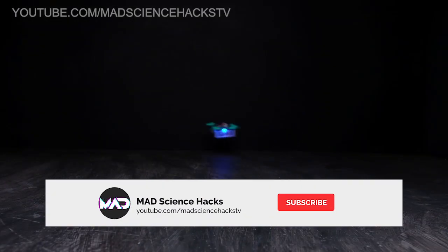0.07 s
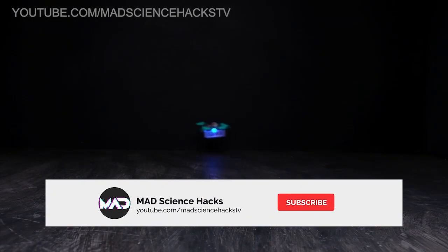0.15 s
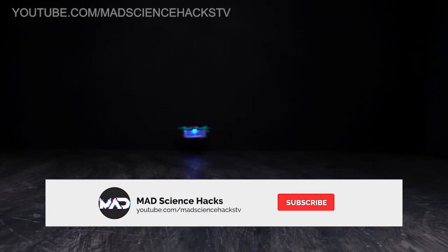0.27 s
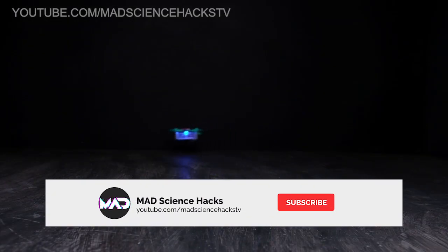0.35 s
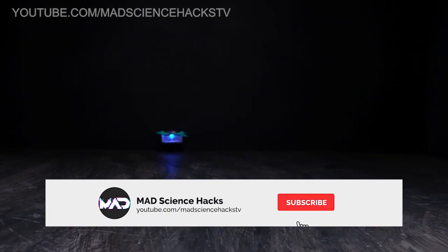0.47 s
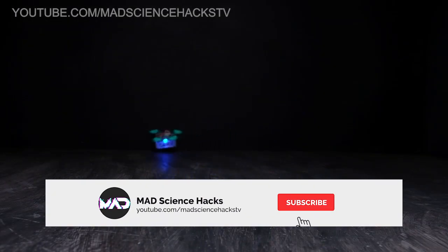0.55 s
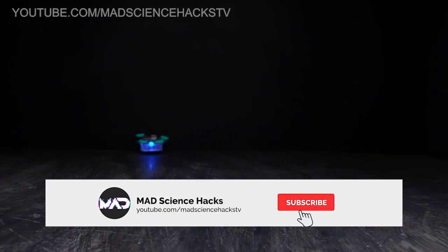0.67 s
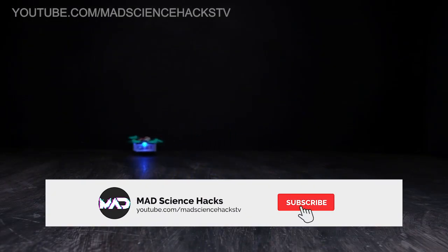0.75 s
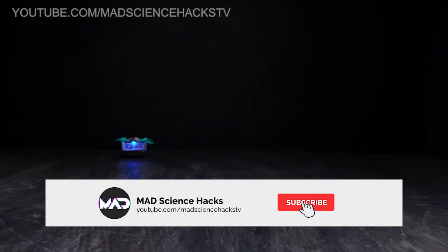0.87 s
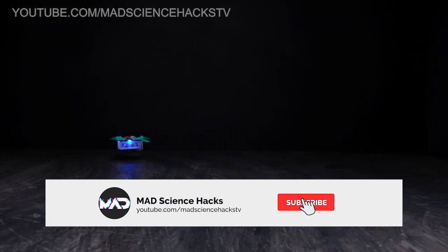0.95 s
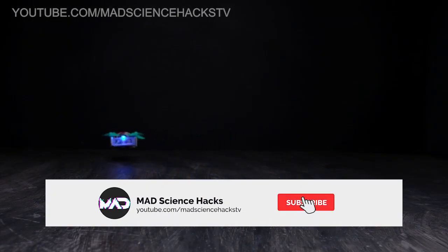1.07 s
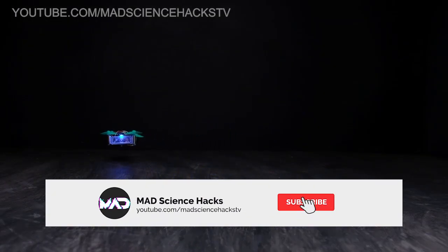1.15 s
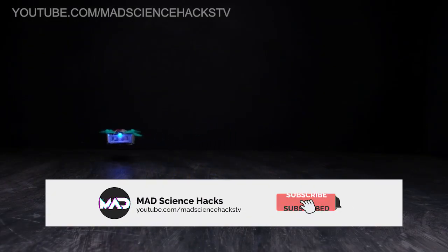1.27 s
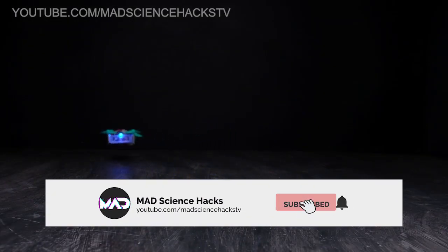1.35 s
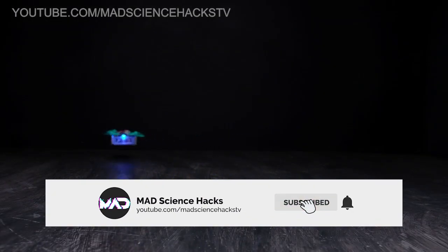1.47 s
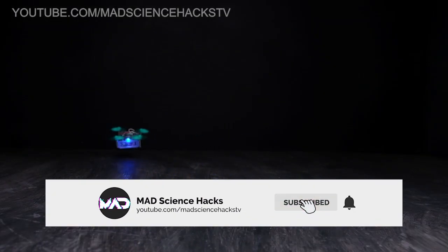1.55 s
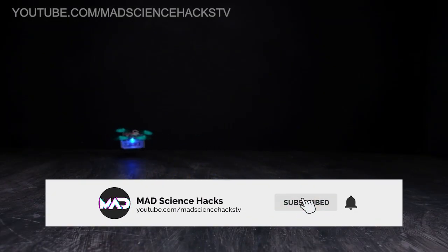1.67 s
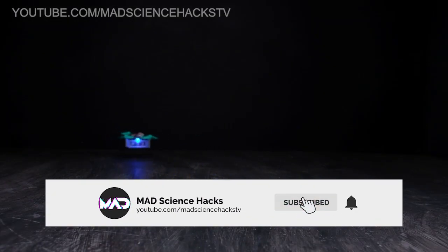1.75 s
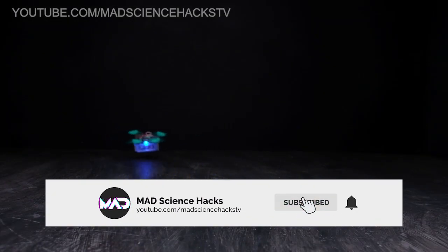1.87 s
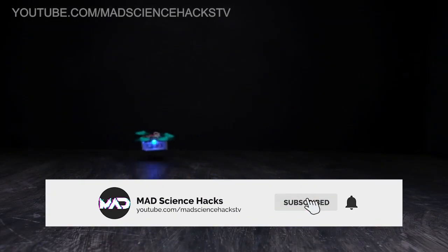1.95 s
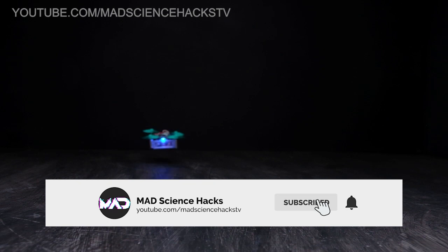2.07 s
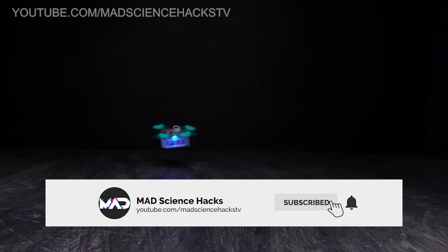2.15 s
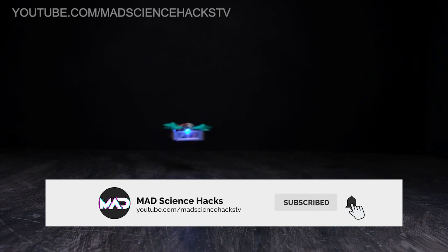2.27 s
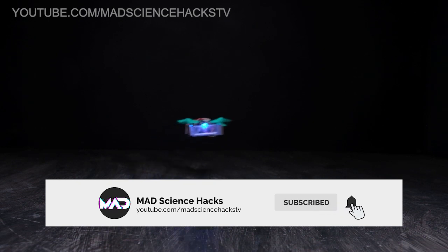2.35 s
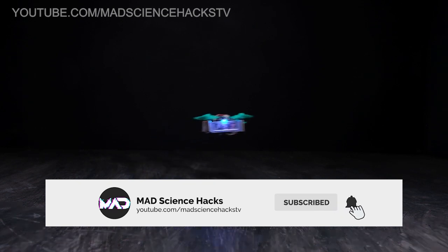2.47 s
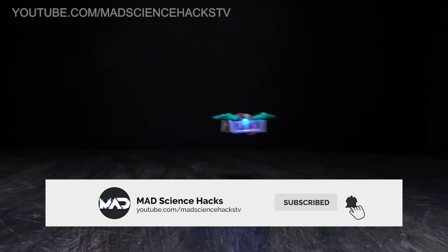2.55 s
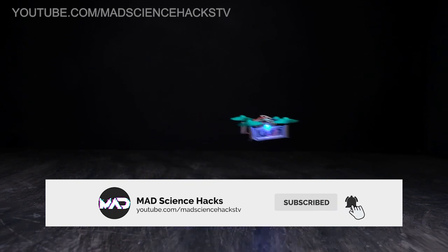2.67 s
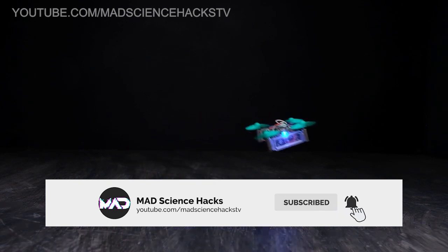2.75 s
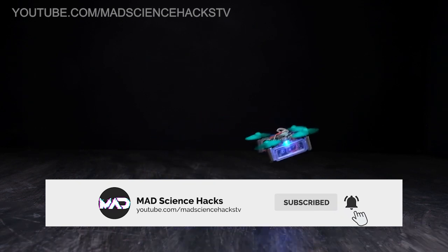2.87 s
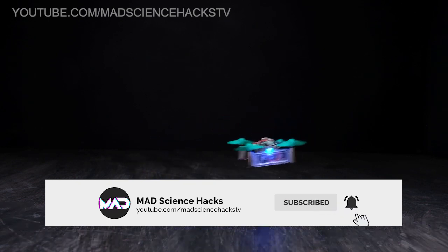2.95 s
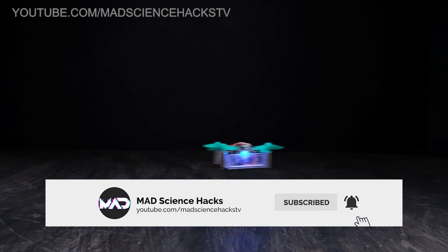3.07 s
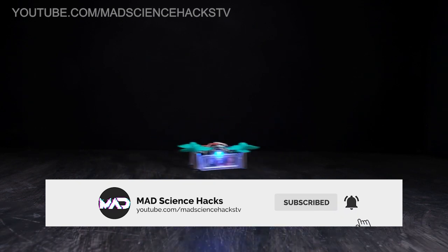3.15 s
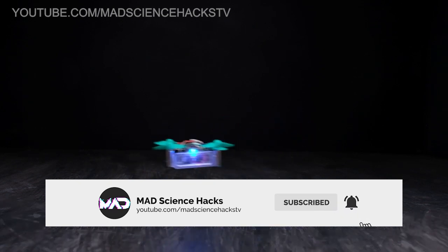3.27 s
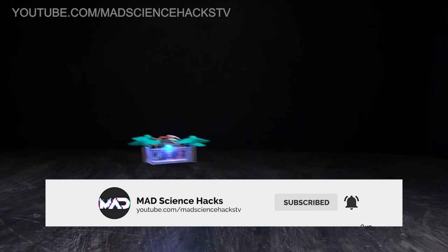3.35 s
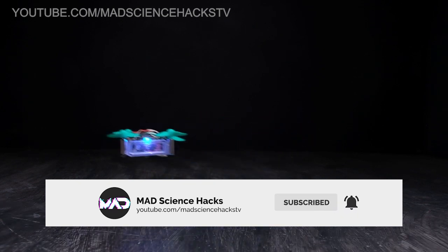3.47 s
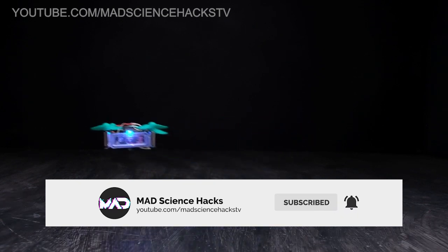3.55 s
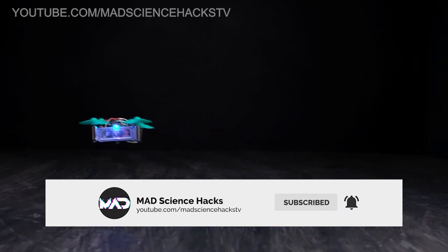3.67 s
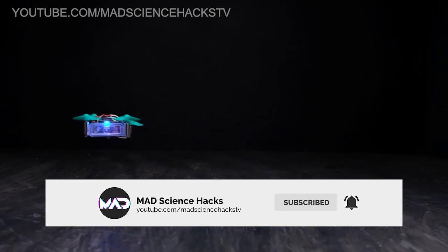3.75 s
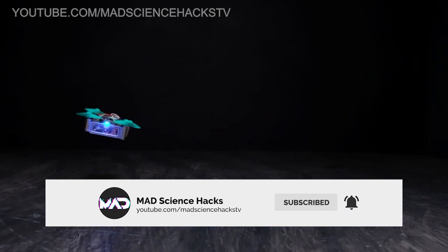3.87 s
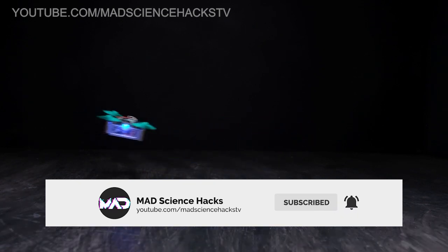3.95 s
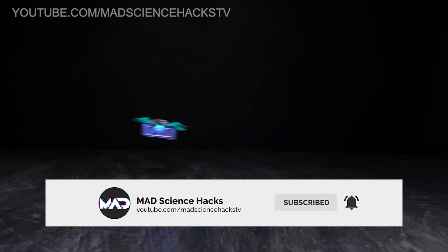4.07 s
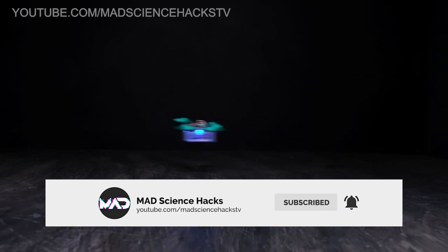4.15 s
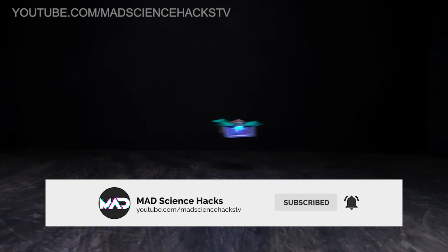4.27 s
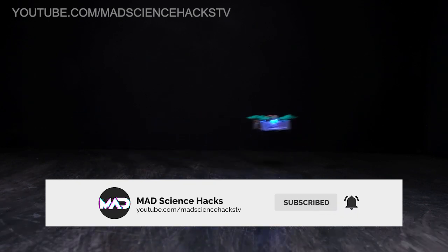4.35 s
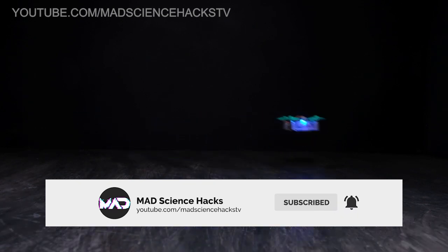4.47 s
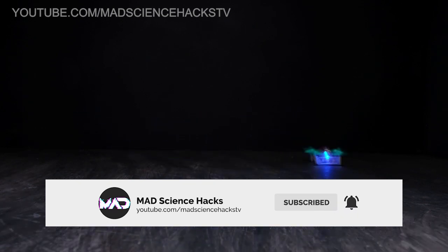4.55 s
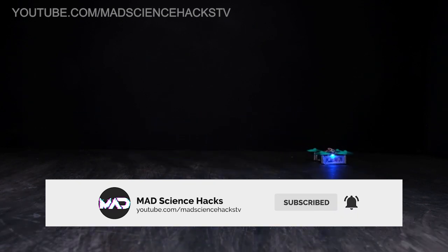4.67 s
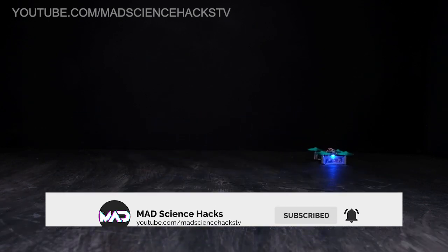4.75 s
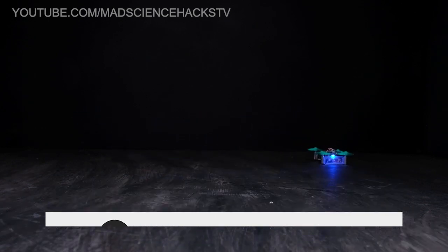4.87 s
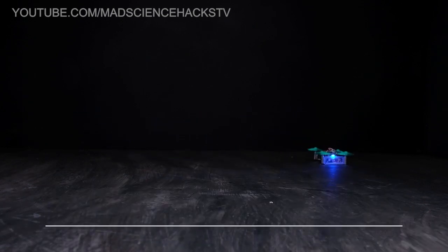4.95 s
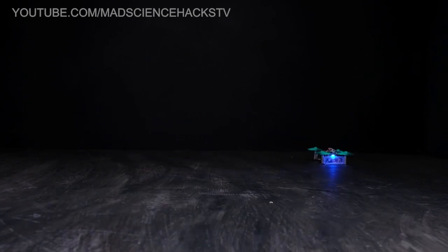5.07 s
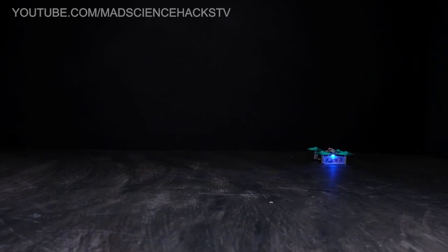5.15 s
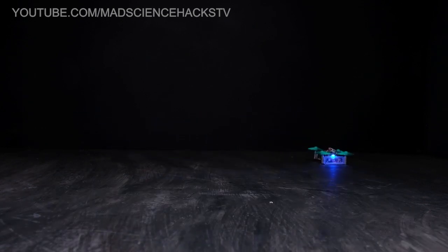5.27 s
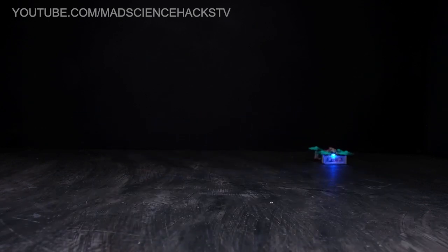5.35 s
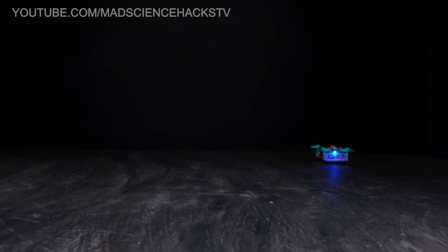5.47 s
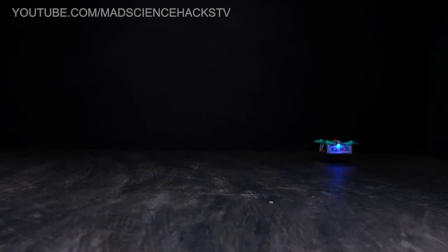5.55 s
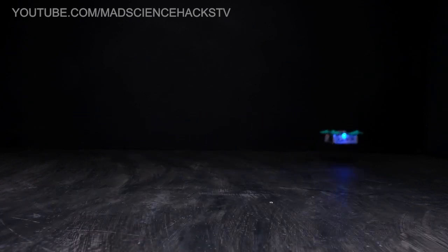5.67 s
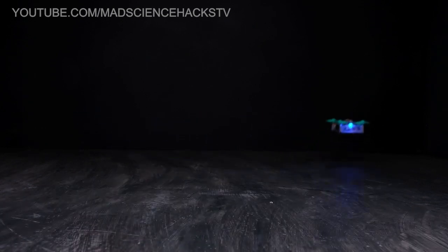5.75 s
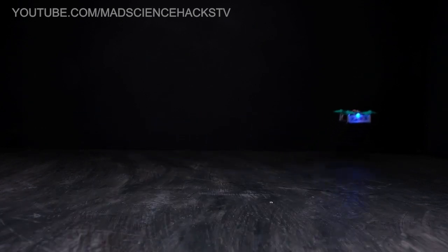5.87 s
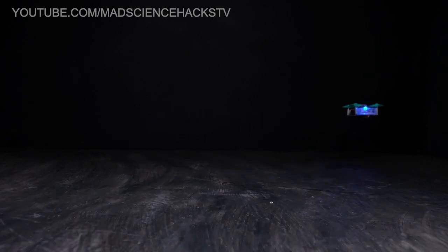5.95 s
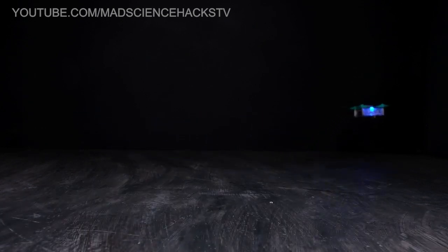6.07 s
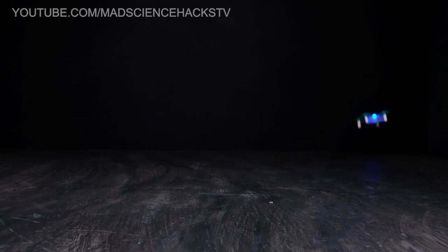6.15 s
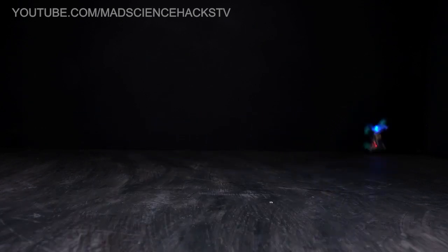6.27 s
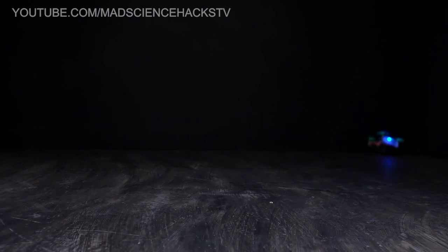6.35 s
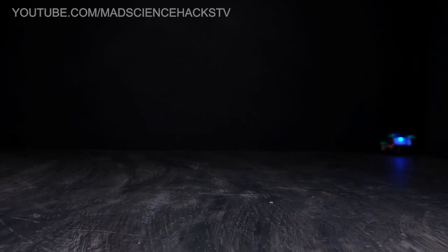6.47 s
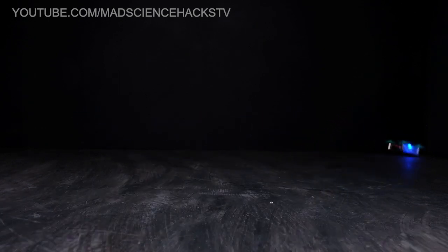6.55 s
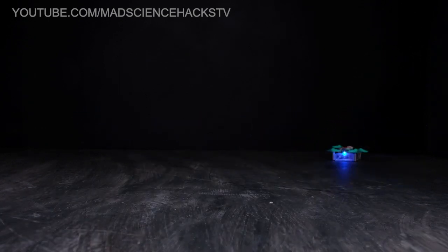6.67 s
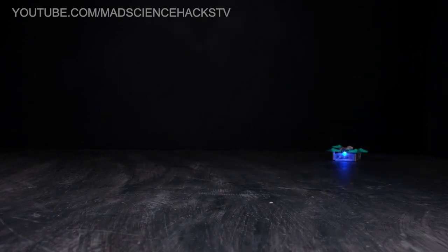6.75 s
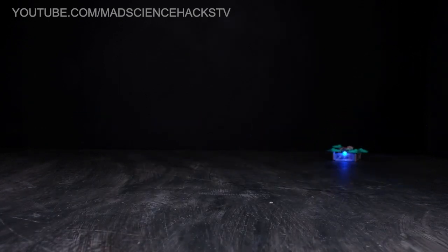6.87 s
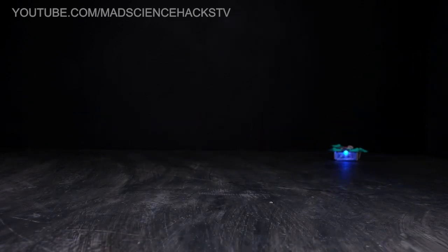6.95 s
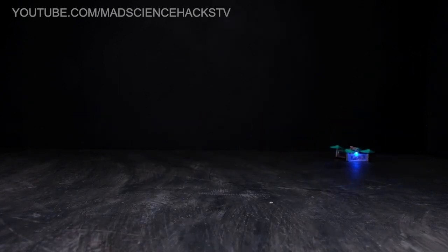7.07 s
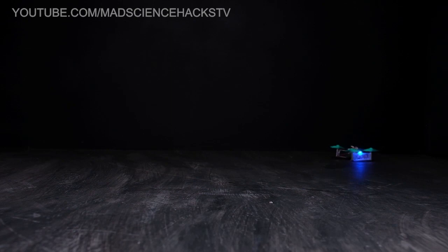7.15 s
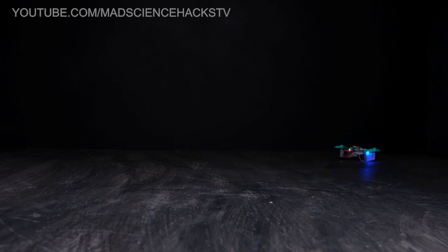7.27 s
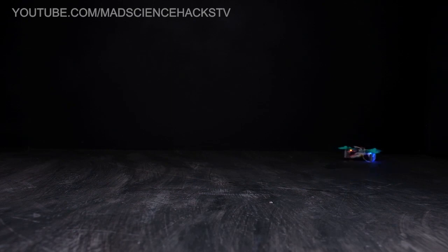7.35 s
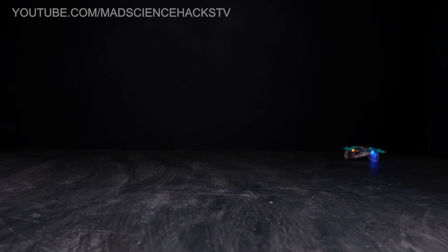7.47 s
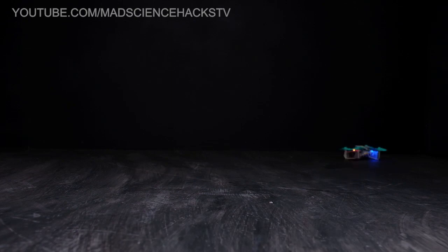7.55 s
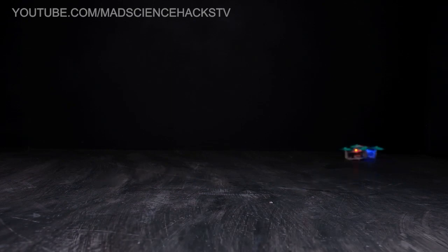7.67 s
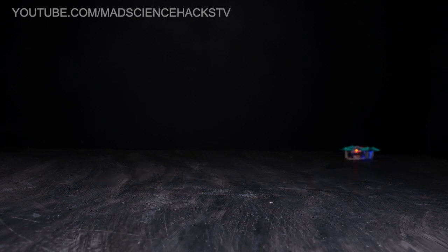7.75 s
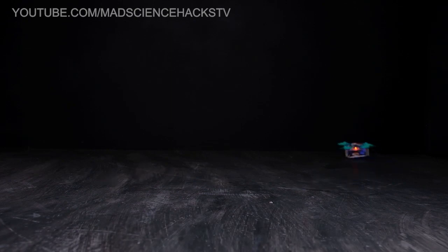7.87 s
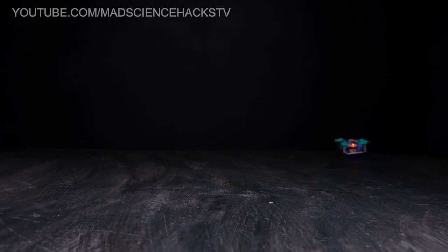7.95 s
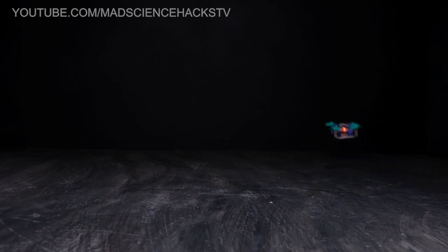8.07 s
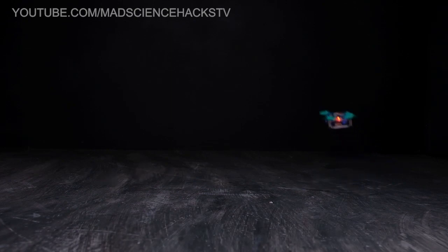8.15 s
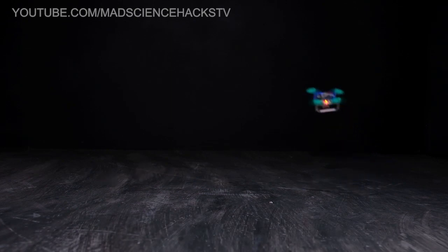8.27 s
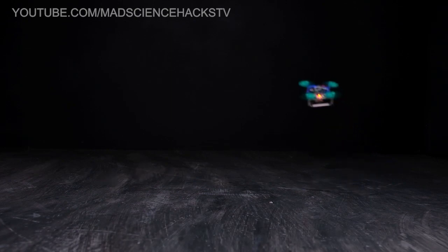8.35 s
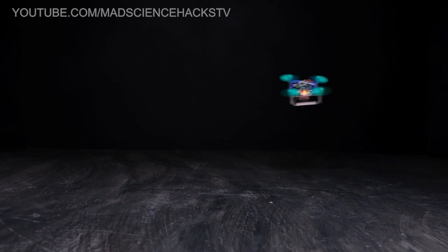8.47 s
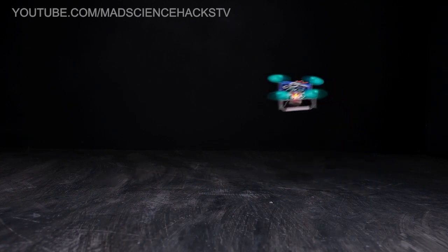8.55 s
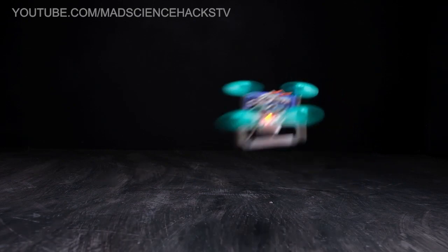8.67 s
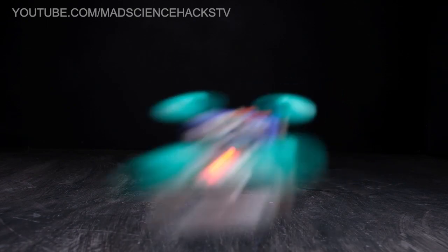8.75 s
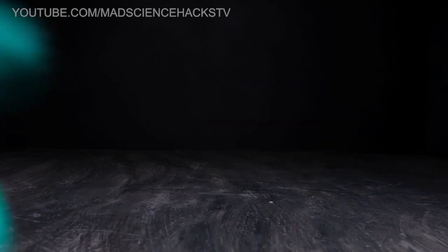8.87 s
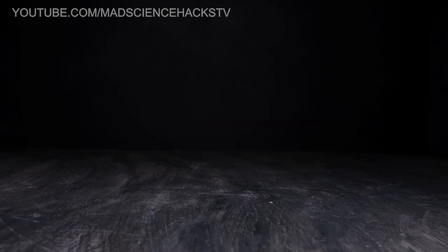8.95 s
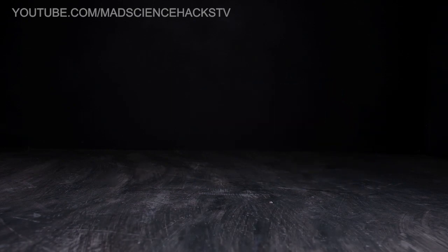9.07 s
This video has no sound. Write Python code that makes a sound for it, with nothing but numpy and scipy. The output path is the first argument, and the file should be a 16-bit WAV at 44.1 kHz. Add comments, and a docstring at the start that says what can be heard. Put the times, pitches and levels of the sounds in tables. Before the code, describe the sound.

In a small, quiet room with faint bass-heavy room tone and low hum, a tiny four-rotor drone hovers from the start. Its slightly detuned whines, near 1.5-1.75 kHz, beat and flutter many times a second under a bright buzzing hiss. A plastic knock sounds at 0.5 s; pitch rises towards 2.4 s and wavers. At 4.4 s throttle is cut, the whine falls steeply, and a dull thump with small taps lands at 4.6 s. Motors spin up at 5.0 s and again at 5.35 s into flight. At 6.26 s it crashes with a crack, choking the rotors, skidding and clattering until 6.75 s. From 7.0 to 7.8 s, seven quick whine bursts peak near 1.8-2 kHz, with soft bumps between. It climbs after 7.8 s, whine unsteady, then at 8.84 s strikes loudly and close, with ticking blades, falling pitch and last knocks around 9.05 s.

```python
"""A tiny four-rotor drone hovers in a room over faint room tone and hum; its four whines weave.
There is an early knock, then the throttle is cut, it drops onto the floor and lifts off again.
It crashes and skids, hops on the floor in bursts of throttle, then climbs and strikes something close.
Each rotor has four blades: the whine follows its turning, and the blades chop noise into a hiss.
Knocks are short bursts of noise that ring the light plastic frame and thump the floor."""
import sys
import numpy as np
from scipy import signal
from scipy.fft import rfft, irfft, next_fast_len
from scipy.io import wavfile

SR = 44100
rng = np.random.default_rng(int(sys.argv[2]) if len(sys.argv) > 2 else 0)


def to_wav(s):
    """Save 16-bit WAV."""
    ch = np.atleast_2d(s).T  # columns
    pcm = np.round(np.clip(ch, -1, 1) * 32767)  # PCM
    wavfile.write(sys.argv[1], SR, pcm.astype(np.int16))


N = 401310
TIME = np.arange(N) / SR

# Blade rate that holds the drone in the air: start_s, fastest_rotor_hz
HOVER = [(0, 1537), (.4, 1590), (1.35, 1595), (2.45, 1767), (3.3, 1675), (3.8, 1726), (4.4, 1734),
         (5.55, 1599), (5.9, 1680), (6.15, 1591), (8.0, 1615), (8.35, 1754), (8.62, 1668), (8.9, 1708)]
# Throttle cut, opened in two steps, eased after the crash, opened, eased again:
# start_s, share_of_hover_speed, settling_time_s
THROTTLE = [(4.425, .15, .125), (5.03, .8, .11), (5.345, 0.99, .06), (6.3, 0.89, .1), (7.8, 1, 0.0301),
            (8.9, 0.77, .12)]
# Bursts of throttle that make it hop on the floor: top_s, blade_rate_hz
BURSTS = [(6.99, 2008), (7.175, 1878), (7.305, 1870), (7.43, 1838), (7.553, 1839), (7.685, 1815),
          (7.82, 1831)]
BURST_RISE_HZ_PER_S, BURST_SAG_HZ_PER_S = 8800, 4700

# How far the flight controller hunts, swinging the rotor speeds: start_s, share_of_speed
HUNT = [(0, .02), (.8, .032), (2.4, .034), (3.4, .054), (5.3, .022), (5.6, .038), (6.2, .036), (6.74, .002),
        (6.92, .002), (7.05, .013), (7.8, .017), (8.0, .04)]
FREE_FLIGHT_HUNT = .03  # share of speed; this much hunting or more counts as full flight
# The drone banks or rocks and its rotors part in speed: middle_s, length_s, depth_0_to_1
BANKS = [(0.049, .3, 0.42), (0.849, .35, 0.41), (2.101, .14, .7), (2.87, .17, 1), (3.98, 0.078, 0.93),
         (5.42, .1, .7), (6.15, .08, 0.92), (7.501, .35, .35), (8.65, .12, 0.89)]
# Gap between fastest and slowest rotor, as a share of speed: at rest, added in flight, added in a full bank
REST_SPREAD, FLIGHT_SPREAD, BANK_SPREAD = .042, .05, .09
# The four rotors, later balanced to unit power together:
# place_slowest_0_to_fastest_1, level_db, hunting_rate_hz
ROTORS = [(.9, 0, 18), (.78, -3, 16), (.3, -6, 17), (-.2, -5.5, 16)]
# Whine partials: multiple_of_shaft_rate, level_db (against the blade tone)
SHAFT_ORDERS = [(1, -18.5), (2, -25), (3, -18), (4, 0), (5, -20), (6, -23), (7, -20)]

# Loudness at the reference blade rate, before the mix levels in drone(), and its growth with speed
REFERENCE_HZ = 1664
WHINE_DB, WHINE_DB_PER_OCTAVE = -38.5, 18
RASP_DB, RASP_DB_PER_OCTAVE = -39.5, 11.5
BANK_WHINE_DB, BANK_RASP_DB = -2.5, 0.5  # in a full bank
REST_WHINE_DB = 1.8  # the floor reinforces the whine while the drone sits on it
REST_SMOOTH_DB = 7  # the inflow is smoother at rest
BURST_WHINE_DB_PER_OCTAVE = -8.5  # a burst churns the air, which holds the whine back
# Blades foul on an obstacle, which chokes whine and rasp: start_s, length_s
FOULS = [(6.26, 0.485), (8.848, .3)]
FOUL_WHINE_DB, FOUL_RASP_DB = -14, -4
# Nearness of the drone to the microphone: start_s, level_db
NEARNESS = [(0, 0.2), (.5, 1), (1.25, -0.5), (1.7, 0.4), (2.4, -1.64), (3.2, 0.76), (4.0, -1), (4.38, -1),
            (5.15, -1), (5.55, 0.7), (6.1, -2.5), (6.85, -2.5), (7.2, -1.7), (8.05, 0), (8.25, -3),
            (8.6, -0.5), (8.84, 6.5), (9.0, -3.5)]

# Balance of pitches in the rotors' buzz and hiss: pitch_hz, level_db
RASP = [(1290, -33), (2200, -5.5), (2910, -3), (3260, -3), (3630, -2), (4010, -1.5), (4420, -3.5),
        (5120, -1.5), (6940, -5.5), (8520, -4), (9960, -10.5), (11000, -11.5), (12400, -10), (15600, -17)]
# Balance of pitches in the rush of air: pitch_hz, level_db
WASH = [(60, -25.5), (180, -13.5), (330, -11), (600, -8.5), (900, -4.5), (1200, 3), (1600, 5.5),
        (2200, -3.5), (3000, -16), (6000, -23)]
# Extra path of the floor's echo as the drone moves about: start_s, lag_ms
ECHO = [(0, 1.12), (.72, 0.72), (1.05, 1.48), (1.35, 1.57), (1.65, 1.04), (1.95, 1.32), (2.7, 3.13),
        (3.35, 3.95), (3.95, 2.9), (4.55, 1.6), (5.7, 1.53), (6.1, .6), (7.9, .45), (9.1, 1.2)]
# The surface mirrors mostly the upper rasp: pitch_hz, level_db
ECHO_COLOUR = [(500, -2.5), (2000, -13), (3500, -2.5), (5300, 3), (7500, -15), (15000, -19)]
ECHO_STRENGTH, ECHO_BEST_LAG_MS, ECHO_WIDTH_OCTAVES = 0.45, 1.7, 0.98

# Spells of a thin sizzle near 4 kHz: start_s, length_s, level_db (at the reference blade rate)
SIZZLES = [(0, .45, -52), (4.65, .95, -47.5), (6.75, 0.13, -53)]
SIZZLE_FADE_DB_PER_S, SIZZLE_DB_PER_OCTAVE = 54, 5.5

# How long the room rings: pitch_hz, time_to_fall_60_db_s
ROOM_DECAY = [(100, 0.48), (500, 0.44), (1500, 0.33), (5000, 0.24), (14000, 0.22)]
# Balance of pitches in the quiet room: pitch_hz, level_db
ROOM_TONE = [(25, -2.5), (40, -8), (60, -12.5), (100, -11.5), (165, -15.5), (340, -18.5), (880, -21),
             (2500, -23), (6000, -23), (15600, -25)]
ROOM_TONE_DB = -59.5
HUM_DB, HUM_END_S = -69.5, 6.27

# Blows on the frame, the contact holding for 79 % of its listed time before it dies away:
# start_s, contact_s, strength_db, body_db and treble_db (against the strength), room_db
BLOWS = [(0.5434, 0.0072, -13.5, -10.5, 2.5, -8), (4.609, 0.007, -16, -9, -14, -2.5),
         (4.668, 0.0024, -35, -9, -4, -0.5), (4.692, 0.0029, -33.5, -13, -5, -2),
         (6.2573, .0074, -8.5, -13.5, -3, -11.5), (6.3134, 0.004, -27.5, -3, 6.5, -9),
         (6.333, 0.0036, -28.5, -6.5, 4, 1), (6.401, 0.0077, -25, -24, 7.5, -3.5),
         (6.423, .0062, -32.5, -4, 3, 1), (6.4631, 0.0031, -31.5, -5, 8.5, -1),
         (6.509, .0077, -32, -9, 9, -1), (6.553, .0086, -37, 0.5, 3.5, -2),
         (6.624, 0.0019, -16.5, -10, -15.5, -4), (6.699, .0023, -40, -4, -1.5, -20),
         (8.8418, 0.0039, -3, -7, -1, -27), (8.856, 0.0058, -24, -22, 3.5, -9),
         (8.934, .0065, -34, -19, 12, -12.5), (9.042, 0.0092, -13.5, -37, -4, -5),
         (9.055, 0.0069, -19.5, -17, -2, -9)]
# Ring of the frame: pitch_hz, width_hz, level_db
FRAME = [(516, 260, -5), (1440, 340, 3.5), (2280, 100, -2.5), (3320, 4700, -11), (7320, 480, -2.5),
         (8560, 410, -5.5)]
THUMP_DB, THUMP_PER_TREBLE = -17, 0.83  # floor thump against the body: duller blows thump more

# Soft low puffs: middle_s, length_s, level_db, centre_hz
PUFFS = [(1.238, 0.06, -56, 240), (1.481, 0.072, -59.5, 220.1), (4.65, .05, -47, 65),
         (5.27, .12, -59.5, 269.6), (8.86, .06, -45, 46), (9.02, 0.17, -51.5, 46)]
# Each hop comes down just before the next burst, harder after a faster one
HOP_LEAD_S, HOP_LENGTH_S, HOP_HZ, HOP_DB, HOP_DB_PER_OCTAVE = 0.067, .05, 222, -60.5, 43
# The frame skids over the floor: start_s, length_s, rumble_db, rumble_fade_db_per_s, scratch_db
SKIDS = [(6.27, .355, -37, 24, -33.5), (6.63, 0.11, -31.5, 92, -59)]
# A blade ticks along an obstacle (one row): start_s, length_s, tick_rate_hz, level_db
GRAZE = (8.871, .025, 850, -24)
CUTOFF_HZ = 15900


def from_db(db):
    """Turn decibels into a gain."""
    return 10 ** (np.asarray(db) / 20)


def rms_one(x):
    """Scale to unit power."""
    return x / np.sqrt(np.mean(x ** 2) + 1e-20)


def in_time(rows):
    """Read each column of a curve at every sample, with straight lines between its points."""
    s, *columns = np.transpose(rows)
    return [np.interp(TIME, s, column) for column in columns]


def since(s):
    """Seconds since a moment, zero before it."""
    return np.maximum(TIME - s, 0)


def during(s, length_s, edge_s=.004):
    """A gate with short ramps."""
    return np.clip(np.minimum(TIME - s, s + length_s - TIME) / edge_s, 0, 1)


def at_hz(points, hz):
    """Read a curve over pitch, stepping evenly in octaves as the ear does."""
    points = np.array(points)
    return np.interp(np.log(hz + 1e-3), np.log(points[:, 0]), points[:, 1])


def colour(x, spectrum):
    """Shape the balance of pitches in a steady sound."""
    size = next_fast_len(N)
    hz = np.arange(size // 2 + 1) * SR / size
    return irfft(rfft(x, size) * from_db(at_hz(spectrum, hz)), size)[:N]


def band(x, low_hz, high_hz):
    """Keep only the pitches between two limits (Butterworth band-pass)."""
    edges_hz = [low_hz, min(high_hz, .45 * SR)]
    return signal.sosfilt(signal.butter(2, edges_hz, "band", fs=SR, output="sos"), x + 1e-18)


def resonance(x, hz, width_hz):
    """Ring at one pitch: a two-pole resonance with gain 1 on top."""
    r = np.exp(-np.pi * width_hz / SR)
    forward = np.array([1, 0, -1]) * (1 - r * r) / 2
    feedback = [1, -2 * r * np.cos(2 * np.pi * hz / SR), r * r]
    return signal.lfilter(forward, feedback, x + 1e-18)


def drift(rate_hz):
    """Slow random wandering with spread 1, made at every 40th sample and joined by lines."""
    r = np.exp(-80 * np.pi * rate_hz / SR)
    slow = signal.lfilter([1], [1, -2 * r, r * r], rng.standard_normal(N // 40 + 2002))
    slow = slow[2000:]  # let the filter settle first
    return np.interp(np.arange(N) / 40, np.arange(len(slow)), rms_one(slow))


def noise():
    """White noise."""
    return rng.standard_normal(N)


def blade_rate():
    """Rotors settle towards each throttle setting; bursts wind them up fast. Gives Hz, octaves of burst."""
    share, before = 1, 1
    for s, setting, settle_s in THROTTLE:
        share = share + (setting - before) * (1 - np.exp(-since(s) / settle_s))
        before = setting
    hz = steady_hz = share * in_time(HOVER)[0]
    for s, top_hz in BURSTS:
        drop_hz = np.maximum(BURST_RISE_HZ_PER_S * (s - TIME), BURST_SAG_HZ_PER_S * (TIME - s))
        hz = np.maximum(hz, top_hz - drop_hz)
    return hz, np.log2(hz / steady_hz)


def loudness(blade_hz, burst, bank, airborne):
    """Whine and rasp grow with speed and nearness; banking turns the whine away, fouling chokes both."""
    octaves = np.log2(blade_hz / REFERENCE_HZ)
    near_db = in_time(NEARNESS)[0]
    fouled = sum(during(s, length_s) for s, length_s in FOULS)
    whine_db = (WHINE_DB + WHINE_DB_PER_OCTAVE * octaves + BURST_WHINE_DB_PER_OCTAVE * burst
                + BANK_WHINE_DB * bank + REST_WHINE_DB * (1 - airborne) ** 2 + FOUL_WHINE_DB * fouled)
    rasp_db = RASP_DB + RASP_DB_PER_OCTAVE * octaves + BANK_RASP_DB * bank + FOUL_RASP_DB * fouled
    return whine_db + near_db, rasp_db + near_db


def rotor(blade_hz, between_db, slope_db=-5.5, count=40, size=2048):
    """Low shaft tones, and the buzz of four slightly unequal blades, falling by slope_db per octave."""
    turn = np.cumsum(blade_hz) / (4 * SR) % 1  # four blade passes make one turn
    angle = np.linspace(0, 1, size + 1)

    def partial(k):
        """One sine wave, k cycles a turn, with unit power and a random start."""
        return np.sqrt(2) * np.sin(2 * np.pi * (k * angle + rng.random()))

    tone = sum(from_db(db) * partial(round(k)) for k, db in SHAFT_ORDERS)
    # partials that are no multiple of four come from the blades being unequal
    buzz = sum(from_db(between_db * (k % 4 > 0) + slope_db * np.log2(k)) * partial(k)
               for k in range(8, count))
    passing = np.cos(8 * np.pi * turn)
    return np.interp(turn, angle, tone), np.interp(turn, angle, rms_one(buzz)), passing


def reflected(x):
    """Propellers push one side and pull the other: the echo returns inverted and sweeps a comb."""
    lag_ms = np.maximum(in_time(ECHO)[0], .1)
    off_best = np.log2(lag_ms / ECHO_BEST_LAG_MS) / ECHO_WIDTH_OCTAVES
    strength = ECHO_STRENGTH * np.exp(-off_best ** 2)
    echo = np.interp(TIME - lag_ms / 1000, TIME, colour(x, ECHO_COLOUR))
    return x - strength * echo


def drone(fast, burst, tone_db=-1.5, buzz_db=-6.5, hiss_db=-1.5, wash_db=-6.0, chop=0.49, between_db=-5.0):
    """Four rotors weave around their set speeds; each chops the air into a hiss."""
    hunt, = in_time(HUNT)
    airborne = np.minimum(hunt / FREE_FLIGHT_HUNT, 1)  # 0 at rest, 1 in flight, judged by the hunting
    bank = sum(depth * np.exp(-((TIME - s) / length_s) ** 2) for s, length_s, depth in BANKS)
    slow = fast * (1 - REST_SPREAD - FLIGHT_SPREAD * airborne - BANK_SPREAD * bank)
    smooth_db = REST_SMOOTH_DB * (1 - airborne)
    whine_db, rasp_db = loudness(fast, burst, bank, airborne)

    # at rest the two middle rotors of the list fall quiet
    gains = np.array([from_db(db) * airborne ** (k in (1, 2)) for k, (_, db, _) in enumerate(ROTORS)])
    gains = gains / np.linalg.norm(gains, axis=0)
    tone = buzz = hiss = 0
    for (place, _, hunt_hz), gain in zip(ROTORS, gains):
        # the controller overshoots, so each speed swings many times a second
        swing_turns = np.cumsum(hunt_hz * (1 + .06 * drift(4))) / SR + rng.random()
        swing = np.sin(2 * np.pi * swing_turns)
        unrest = hunt * (swing + .2 * drift(12) + .06 * drift(150)) + .002 * drift(60)
        blade_hz = (slow + place * (fast - slow)) * (1 + unrest)
        low, high, passing = rotor(blade_hz, between_db)
        tone = tone + gain * low * from_db(1.0 * drift(25))
        buzz = buzz + gain * high * from_db(4.5 * drift(71))
        hiss = hiss + gain * noise() * (1 + chop * passing)

    # smooth inflow trades hiss for clean buzz
    buzz = from_db(buzz_db + smooth_db / 2) * rms_one(colour(buzz, RASP))
    hiss = from_db(hiss_db - smooth_db / 2) * rms_one(colour(hiss, RASP))
    wash = from_db(wash_db - smooth_db) * rms_one(colour(noise(), WASH))
    whine = from_db(whine_db + tone_db) * tone
    return whine + from_db(rasp_db) * reflected(buzz + hiss + wash)


def sizzle(blade_hz, low_hz=3650, high_hz=4250):
    """A narrow hiss in spells that swell in and fade out, stronger at higher rotor speed."""
    spells = 0
    for s, length_s, db in SIZZLES:
        outside_s = since(s + length_s) + np.maximum(s - TIME, 0)
        spells = spells + from_db(db - SIZZLE_FADE_DB_PER_S * outside_s)
    speed_db = SIZZLE_DB_PER_OCTAVE * np.log2(blade_hz / REFERENCE_HZ)
    return spells * from_db(speed_db) * rms_one(band(noise(), low_hz, high_hz))


def room(x, count=9):
    """Many blended echoes make a tail that dies faster in the treble."""
    age = TIME[:SR * 2 // 3]
    edges_hz = np.geomspace(50, 17000, count + 1)
    tail = 0
    for low, high in zip(edges_hz, edges_hz[1:]):
        decay_s = at_hz(ROOM_DECAY, np.sqrt(low * high))
        tail = tail + band(rng.standard_normal(len(age)), low, high) * from_db(-60 * age / decay_s)
    tail = tail * (1 - np.exp(-age / 0.00068))  # the echoes build up quickly
    return signal.fftconvolve(x, tail / np.linalg.norm(tail))[:N]


def room_tone():
    """The faint steady noise of the room, strongest in the bass."""
    return from_db(ROOM_TONE_DB) * rms_one(colour(noise(), ROOM_TONE))


def mains_hum(hum_hz=100):
    """Mains hum: one faint sine wave that stops partway."""
    return from_db(HUM_DB) * during(0, HUM_END_S) * np.sqrt(2) * np.sin(2 * np.pi * hum_hz * TIME)


def blows(ring_s=0.0016, dry_db=-4.0, thump_hz=128, thump_s=0.0093, mid_top_hz=3900, treble_top_hz=14500):
    """Blades crack on an obstacle, the frame rings, the floor thumps; gives direct sound and room feed."""
    cracks = []
    for low, high in [(140, 780), (1150, mid_top_hz), (4000, treble_top_hz)]:  # body, middle, treble
        crack = band(noise(), low, high)
        ring = sum(from_db(db) * resonance(crack, hz, width) for hz, width, db in FRAME)
        cracks.append(from_db(dry_db) * crack + ring)
    cracks = np.array(cracks)
    direct, feed = np.zeros(N), np.zeros(N)
    for s, contact_s, strength_db, body_db, treble_db, room_db in BLOWS:
        levels_db = strength_db + np.array([body_db, 0, treble_db])
        bass_db = strength_db + body_db + THUMP_DB - THUMP_PER_TREBLE * treble_db
        at = slice(int(s * SR), min(N, int(s * SR) + SR // 10))
        age = TIME[at] - TIME[at][0]
        release = np.exp(-np.maximum(age - contact_s * 0.79, 0) / ring_s)
        contact = (1 - np.exp(-age / 0.0003)) * release
        hit = sum(from_db(db) * rms_one(crack * contact) for db, crack in zip(levels_db, cracks[:, at]))
        hit = hit * np.sqrt(np.mean(contact ** 2))
        thump = np.sin(2 * np.pi * thump_hz * age) * np.exp(-age / thump_s)
        hit = hit + from_db(bass_db) * thump
        direct[at] += hit
        feed[at] += from_db(room_db) * hit
    return direct, feed


def puffs():
    """Short swells of low noise, including those of the hops."""
    out = np.zeros(N)
    for s, length_s, db, hz in list(PUFFS) + hops():
        near = np.abs(TIME - s) < 2 * length_s
        air = rms_one(band(rng.standard_normal(near.sum()), hz * .6, hz * 2.0))
        out[near] += from_db(db) * air * np.exp(-2 * ((TIME[near] - s) / length_s) ** 2)
    return out


def skid(grains_per_s=3000):
    """Dense small slips shake the floor and scratch the plastic."""
    slips = noise() * (rng.random(N) < grains_per_s / SR)
    rumble = rms_one(0.57 * band(slips, 100, 1060) + resonance(slips, 400, 90) + resonance(slips, 133, 25))
    scratch = rms_one(0.13 * band(slips, 1800, 14300) + resonance(slips, 7200, 480))
    out = 0
    for s, length_s, rumble_db, fade_db_per_s, scratch_db in SKIDS:
        # the rumble fades from the first touch, the scratch swells in mid-slide
        fading = from_db(rumble_db - fade_db_per_s * since(s)) * rumble
        swelling = from_db(scratch_db) * np.sin(np.pi * since(s) / length_s) * scratch
        out = out + during(s, length_s) * (fading + swelling)
    return out


def hops():
    """Make one puff for each touchdown between two bursts, in the columns of PUFFS."""
    landings = []
    for (_, top_hz), (next_s, _) in zip(BURSTS, BURSTS[1:]):
        db = HOP_DB + HOP_DB_PER_OCTAVE * np.log2(top_hz / REFERENCE_HZ)
        landings.append((next_s - HOP_LEAD_S, HOP_LENGTH_S, db, HOP_HZ))
    return landings


def graze():
    """A blade brushing along an obstacle gives a quick train of ticks."""
    s, length_s, ticks_hz, db = GRAZE
    tick_count = np.floor(np.cumsum(ticks_hz * (1 + 0.028 * drift(220))) / SR)
    ticks = np.diff(tick_count, prepend=0)
    progress = np.clip((TIME - s) / length_s, 0, 1)
    touch = np.sqrt(np.maximum(np.sin(np.pi * progress), 0))
    return from_db(db) * touch * rms_one(band(ticks, 1040, 5500) + 0.56 * band(ticks, 5000, 8800))


def scene(drone_room_db=-11.5):
    """Drone and knocks in the room, over faint room tone and mains hum."""
    blade_hz, burst = blade_rate()
    flight = drone(blade_hz, burst) + sizzle(blade_hz)
    direct, feed = blows()
    echoes = room(feed + from_db(drone_room_db) * flight)
    mix = flight + echoes + room_tone() + mains_hum() + direct + puffs() + skid() + graze()
    return mix[None]


def record(dry, top=1.03):
    """Loud peaks overload softly, then the highest pitches are cut."""
    low_pass = signal.ellip(10, .1, 80, CUTOFF_HZ, fs=SR, output="sos")
    return signal.sosfilt(low_pass, top * np.tanh(dry / top))


dry = scene()
out = record(dry)
to_wav(out)
```